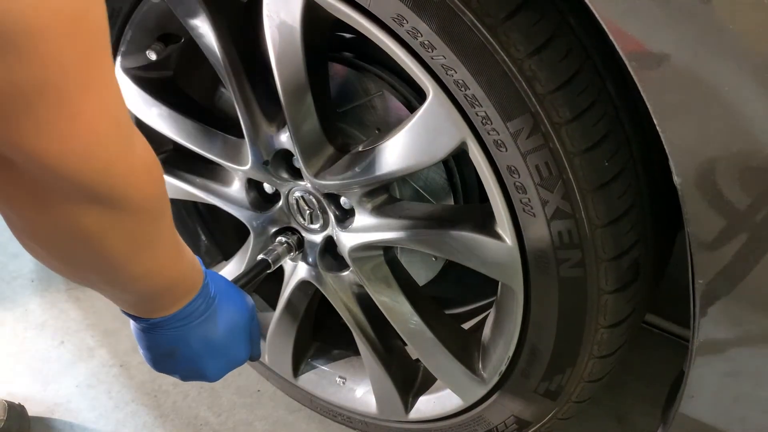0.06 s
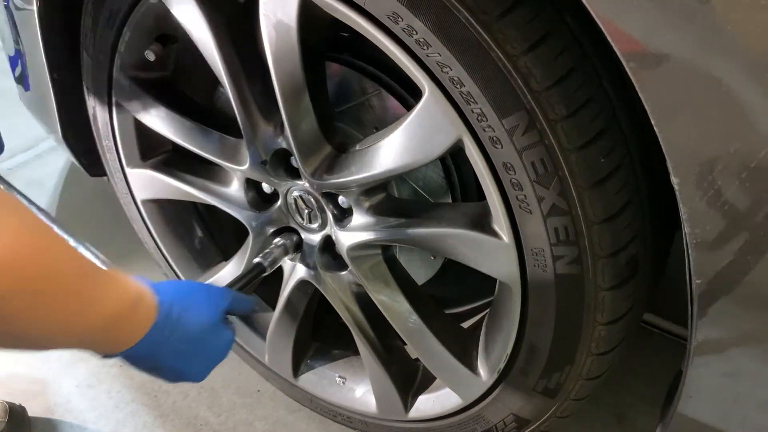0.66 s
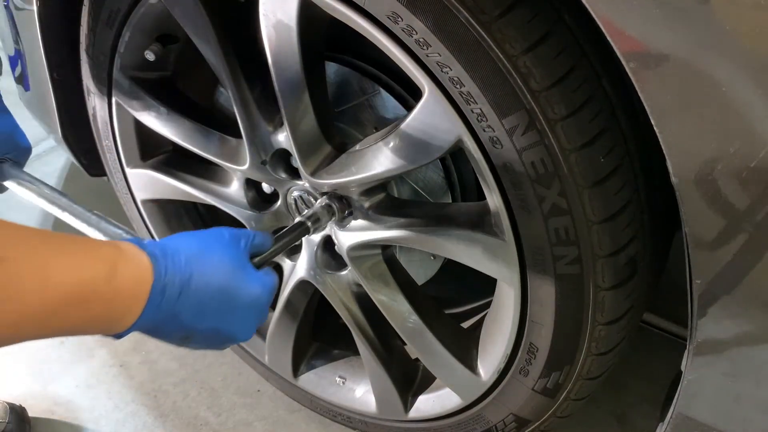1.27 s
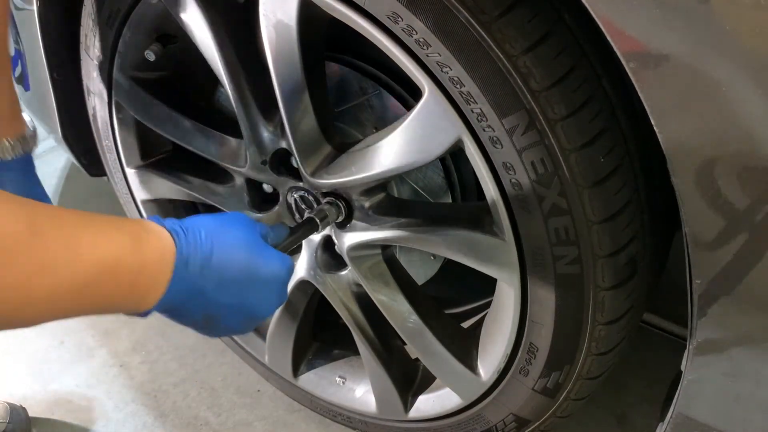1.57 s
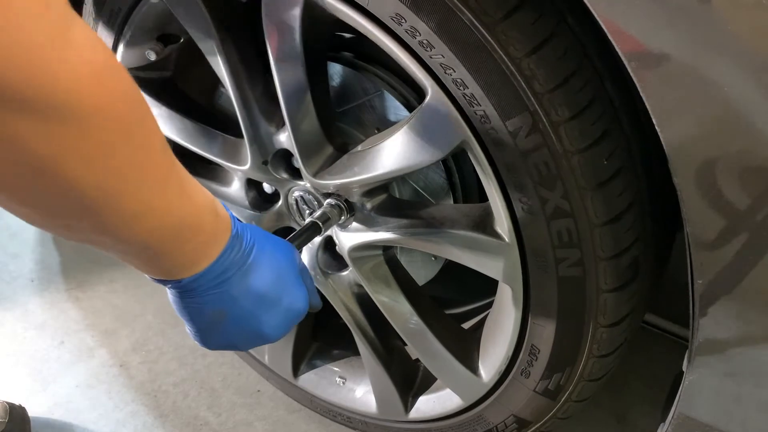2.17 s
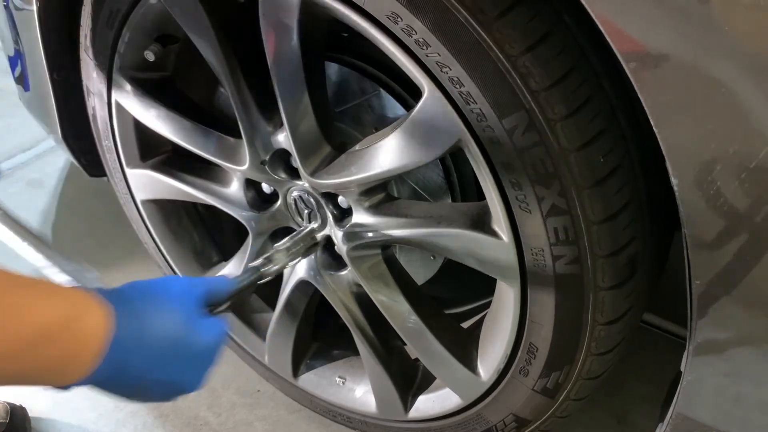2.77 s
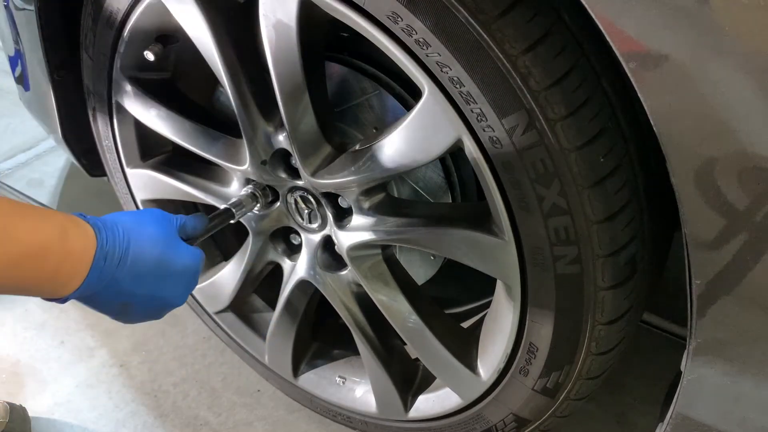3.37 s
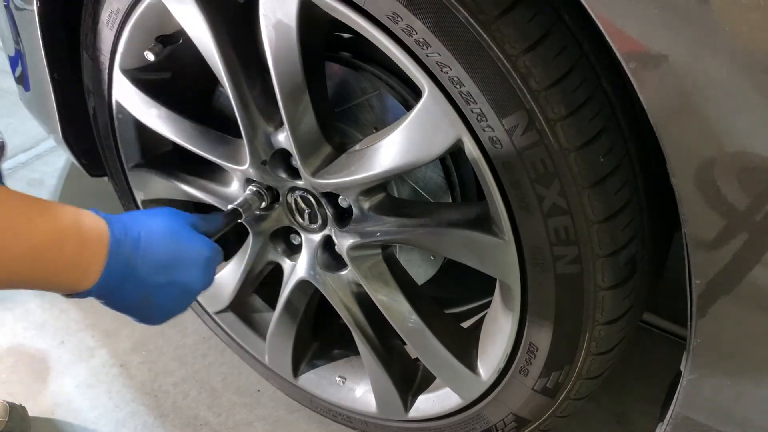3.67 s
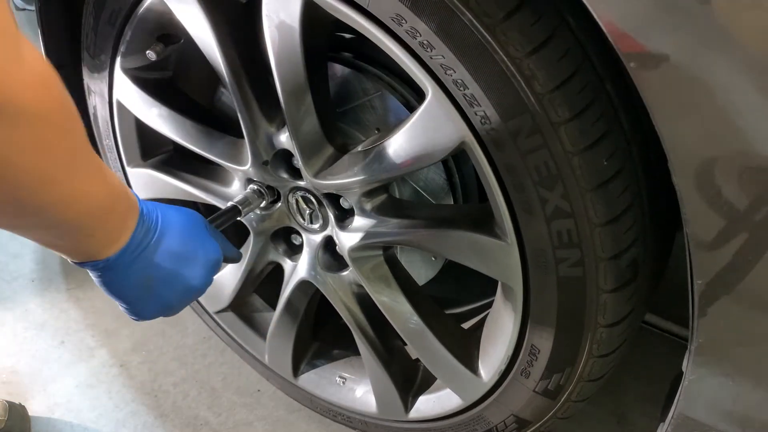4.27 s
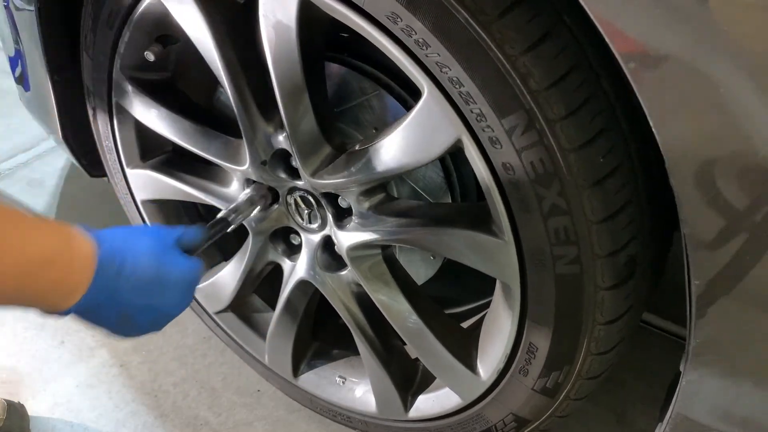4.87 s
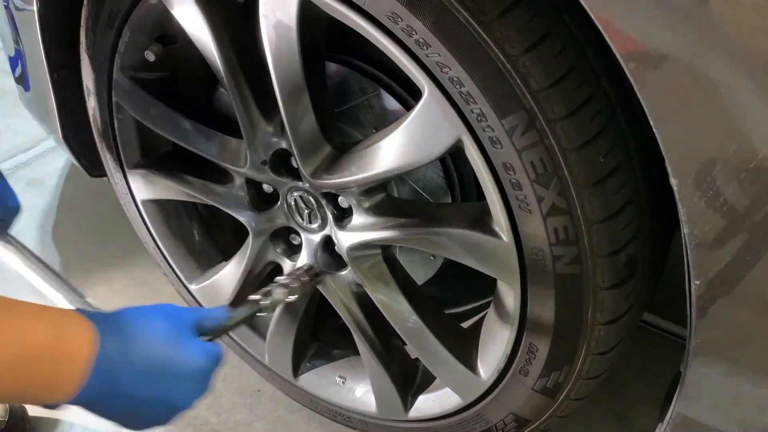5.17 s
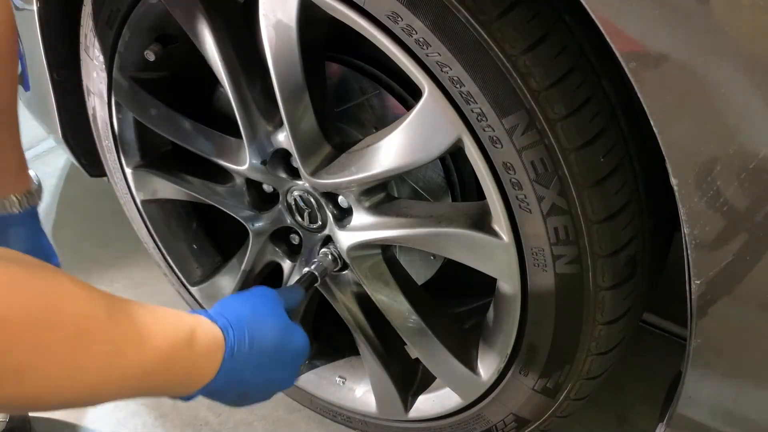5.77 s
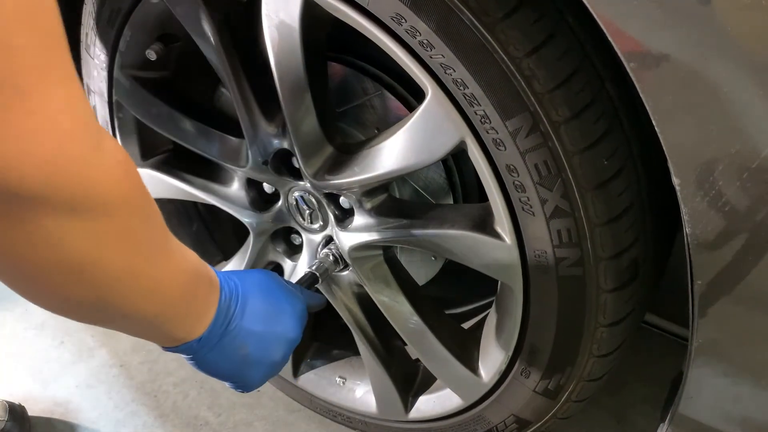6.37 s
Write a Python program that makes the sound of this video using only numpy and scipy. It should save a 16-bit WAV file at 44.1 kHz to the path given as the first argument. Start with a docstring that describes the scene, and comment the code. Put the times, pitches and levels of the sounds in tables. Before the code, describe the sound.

Close by in a small garage, a torque wrench gives a loud, sharp snap on a lug nut, then a softer clack as it resets, leaving the alloy wheel ringing faintly. The socket pings off, knocks against the wheel and slides onto the next nut with faint ratchet ticking. The double click comes three times, and the socket finally clatters onto another nut. A low motor hum and soft rushing air continue underneath.

```python
"""Torque wrench on three lug nuts

A click-type wrench checks an alloy wheel in a home garage. On each nut the pawl trips under load,
then snaps back; the wheel rings on and the tyre rocks. The socket pings as it is pulled off and is
knocked onto the next nut; once it is seated, the ratchet ticks faintly.
A motor hums behind soft rushing air; a limiter ducks after loud snaps."""
import sys
import numpy as np
from scipy import signal
from scipy.fft import rfft, irfft, next_fast_len
from scipy.io import wavfile
from scipy.ndimage import uniform_filter1d

SR = 44100
rng = np.random.default_rng(int(sys.argv[2]) if len(sys.argv) > 2 else 0)


def to_wav(s):
    """Save 16-bit WAV."""
    ch = np.atleast_2d(s).T  # columns
    pcm = np.round(np.clip(ch, -1, 1) * 32767)  # PCM
    wavfile.write(sys.argv[1], SR, pcm.astype(np.int16))


N = 282681
TIME = np.arange(N) / SR

# air spectrum: f/Hz, relative level/dB
AIR_COLOUR = [(20, -39.5), (38, -17.5), (54, -3.5), (85, -6), (120, 1.5), (170, -8.5), (400, -11),
              (850, -21.5), (1600, -22.5), (3200, -32), (7000, -52), (11000, -61.5), (16000, -75.5)]
# air loudness: t/s, level/dB
AIR_LEVEL = [(0, -41.5), (1.2, -42.5), (2.1, -43), (3.2, -43), (4.2, -43.5), (5.2, -45.5), (5.9, -45),
             (6.4, -45.5)]
# motor tones: f/Hz, early level/dB, late level/dB
HUM = [(60.4, -48.5, -55), (109.38, -55.5, -48.5), (237.95, -58.5, -58.5)]
# reverberation time: f/Hz, t60/s
GARAGE_T60 = [(150, 0.17), (1000, 0.74), (3000, 0.64), (7000, 0.5865), (11000, 0.3972), (16000, 0.1522)]
# reverberation strength: f/Hz, level/dB
GARAGE_LEVEL = [(150, -8.5), (500, -9.5), (1500, -5.5), (4000, -5.5), (7000, -12.5), (11000, -12),
                (16000, -11)]
# left-right likeness of noise: f/Hz, coherence/0-1
COHERENCE = [(60, 1), (300, 0.9), (700, 0.2), (1500, 0.01), (4000, 0.3), (6000, 0), (7500, 0.35),
             (9500, .95)]
# left over right: f/Hz, level/dB
BALANCE = [(120, -0.4), (350, 2.5), (1200, 2.5), (2500, 0.5), (5500, -2.5), (8000, 0)]

# modes of hub, wheel, seated socket and free socket: f/Hz, level/dB, t60/s
HUB_MODES = [(1530, -14.5, 0.13), (1607, 9.5, 0.037), (3020, 5, .04)]
WHEEL_OVERTONES = [(1987, -7, 1.34), (1810, -8.5, .5), (6600, -20, .38)]
SOCKET_HELD = [(11850, 2, 0.17), (12130, -5, .05), (12480, -5, .02)]
SOCKET_FREE = [(12110, 6, .13), (12110, -10, 0.2), (12435, -11.5, 0.61)]
WHEEL_HZ, WHEEL_T60_S = 1067.4, 2.2

# socket contact spectrum: f/Hz, relative level/dB
KNOCK_COLOUR = [(80, -21.5), (250, -13.5), (620, 3), (1100, -3.5), (1550, -2), (2100, 2), (2800, 4),
                (4200, -0.5), (7100, -4), (8600, -10.5), (10500, -3), (13000, 0), (16000, -4)]
# socket and extension resonances: f/Hz, width/Hz, level/dB
EXTENSION_PEAKS = [(1552.6, 140, 8.5), (2813.4, 180, -14), (4470, 840, 2.5), (7170, 650, 13)]
# socket slips off or grazes the wheel: t/s, contact/dB, ping/dB
PINGS = [(0.7024, -30, -21), (2.6633, -23.5, -18), (3.163, -61, -44), (3.229, -33, -26.5),
         (4.869, -32.5, -19), (5.44, -44, -41)]
# socket knocks on its way to the next nut; faint ratchet ticks once seated: t/s, level/dB, timbre
# the rows at 1.85, 3.61, 3.77 and 3.91 s are the ticks; they only share the "nut" timbre
KNOCKS_AND_TICKS = [(1.105, -43.5, "nut"), (1.25, -17.5, "spoke"), (1.2592, -26.5, "spoke"),
                    (1.4053, -45, "nut"), (1.4712, -34.5, "nut"), (1.8467, -41, "nut"),
                    (3.2688, -17.5, "nut"), (3.6078, -40, "nut"), (3.77, -42.5, "nut"),
                    (3.9063, -39.5, "nut"), (4.8225, -27.5, "nut"), (5.4590, -20, "hub"),
                    (5.479, -34, "hub"), (5.6401, -31.5, "hub"), (5.6589, -33, "nut"),
                    (5.6929, -23.5, "nut"), (5.711, -43, "nut"), (5.753, -29.5, "nut")]
KNOCK_REF_DB = -29.5  # firm above, light below
# socket slides home: t/s, contact/dB, ring/dB, bottoming t/s, clunk/dB
SEATINGS = [(1.4995, -27, -33, 1.485, -37), (3.427, -20, -57, 3.450, -33.5),
            (5.746, -24.5, -33, 5.752, -37.5)]
# contact timbres: treble/dB, clunk/dB, t60/s, top edge/Hz
PING_TIMBRE = dict(treble_db=7, clunk_db=-6, t60=0.016, top_hz=14500)
KNOCK_TIMBRES = {"spoke": dict(treble_db=6, clunk_db=-2, t60=0.025, top_hz=13400),
                 "hub": dict(treble_db=8, clunk_db=-2, t60=0.038, top_hz=12800),
                 "nut": dict(treble_db=0, clunk_db=2.5, t60=.044, top_hz=15400)}
SEATING_TIMBRE = dict(treble_db=8, clunk_db=8.5, t60=0.059, top_hz=15900)

# snap spectrum: f/Hz, relative level/dB
SNAP_COLOUR = [(60, -24), (170, -12), (280, 1), (480, -1), (750, -5.5), (1100, -8.5), (1600, -2),
               (2500, -3.5), (3600, 1.5), (5000, -3), (7000, 2.5), (8600, -6), (10500, -0.5), (13000, 5.5),
               (16000, -6.5)]
# damped wrench resonances: f/Hz, width/Hz, level/dB
WRENCH_PEAKS = [(1553, 23, 4.5), (1651.8, 50, -0.5), (1900, 250, 4), (2330, 120, 0), (2810, 100, -7.5),
                (3360, 130, 0.5), (3690, 180, 2.5), (5370, 48, -4.5), (5696, 90, -3), (6310, 77, -1),
                (6410, 81, 4), (6958, 100, 4), (9920, 110, 7.5), (11740, 21, -2)]
# pawl trips and resets: t/s, level/dB, treble/dB, rattle t60/s, wheel ring/dB
TRIPS = [(0.1323, 7.5, 0, 0.026, -29.5), (2.3244, 7.5, 5.5, 0.0077, -35.5), (4.5026, 7, 3.5, 0.02, -27.5)]
RESETS = [(0.512, -3, -5.5, 0.056, -30.5), (2.5265, -2, 0, 0.03, -28.5), (4.7093, -3, 2, 0.05, -32)]
# snap timbres: body/dB, bass edge/Hz, scrape/dB, socket/dB, heard build-up/s, wheel overtones/dB
TRIP_TIMBRE = dict(body_db=-6.5, bass_hz=50, scrape_db=-10, socket_db=-15, swell_s=.5, overtones_db=-6.5)
RESET_TIMBRE = dict(body_db=5.5, bass_hz=303, scrape_db=-22, socket_db=-19, swell_s=0.092, overtones_db=0.5)


def from_db(db):
    return 10 ** (np.asarray(db) / 20)


def at_hz(points, hz):
    """Table lookup on a log-frequency axis."""
    known_hz, values = np.transpose(points)
    return np.interp(np.log(hz + 1), np.log(known_hz), values)


def bins_hz(size):
    return np.arange(size // 2 + 1) * SR / size


def lowpass(hz, edge_hz, order):
    return 1 / (1 + (hz / edge_hz) ** order)


def add(out, at_s, sound):
    start = round(at_s * SR)
    out[:, start:start + sound.shape[-1]] += sound[..., :N - start]


def wander(rate_hz, size):
    """Straight lines between random values."""
    return np.interp(TIME[:size] * rate_hz, np.arange(200), rng.standard_normal(200))


def noise(colour, size):
    """Partly coherent stereo noise, rms 1."""
    mid, side = rfft(rng.standard_normal((2, size)))
    coherence = np.clip(at_hz(COHERENCE, bins_hz(size)), 0, 1)
    stereo = np.sqrt(1 + coherence) * mid + np.sqrt(1 - coherence) * side * [[1], [-1]]
    x = irfft(colour * stereo, size)
    return x / np.sqrt(np.mean(x ** 2) + 1e-20)


def ring(modes, size):
    """Decaying sines of a struck object."""
    t = TIME[:size]
    return sum(from_db(db - 60 * t / t60_s) * np.sin(2 * np.pi * hz * t) for hz, db, t60_s in modes)


def resonant(colour, peaks, hz):
    """Broad spectrum with resonances on top."""
    power = sum(from_db(db) ** 2 / (1 + (2 * (hz - peak_hz) / width_hz) ** 2)
                for peak_hz, width_hz, db in peaks)
    return from_db(at_hz(colour, hz)) * np.sqrt(1 + power)


def bump(pitch_hz, swell_s, relative_width, size=32768):
    """Soft low resonance that swells and fades."""
    age = TIME[:size] / swell_s
    band = 1 / (1 + ((bins_hz(size) / pitch_hz - 1) / relative_width) ** 4)
    return age * np.exp(1 - age) * noise(band, size)


def rattle(colour, treble_db, t60_s, hold_s):
    """One blow: parts chatter for hold_s, then die away."""
    size = 2 * (len(colour) - 1)
    hardness = from_db(treble_db * (1 - lowpass(bins_hz(size), 8500, order=6)))
    decay = from_db(-60 * np.maximum(TIME[:size] - hold_s, 0) / t60_s)
    return noise(colour * hardness, size) * decay


def add_scrape(out, blow_s, colour, swell_s, db):
    """Steel slides on steel, swelling up to the blow."""
    size = 2 * (len(colour) - 1)
    rasp = noise(colour, size) * np.exp(-TIME[:size][::-1] / swell_s)
    add(out, blow_s - size / SR, from_db(db) * rasp)


def air():
    """Soft rush, easing slightly."""
    size = next_fast_len(N)
    rush = noise(from_db(at_hz(AIR_COLOUR, bins_hz(size))), size)[:, :N]
    return rush * from_db(np.interp(TIME, *np.transpose(AIR_LEVEL)))


def motor(waver_db=1.0, shift_s=5.23, fade_s=0.5):
    """Wavering hum; its tones shift in balance around shift_s."""
    out = np.zeros(N)
    late = np.clip((TIME - shift_s) / fade_s + .5, 0, 1)
    for hz, early_db, late_db in HUM:
        waver = wander(rate_hz=10, size=N)
        level_db = early_db + (late_db - early_db) * late + waver_db * waver
        out += np.sqrt(2) * from_db(level_db) * np.sin(2 * np.pi * hz * TIME + waver / 2)
    return out


def garage(x, build_s=0.002, near_s=0.09, size=32768):
    """Dense reflections, strongest off the nearby floor and car; each band has its own decay."""
    t, hz, response = TIME[:size], bins_hz(size), 0
    white = rfft(noise(np.ones(len(hz)), size))
    onset = (1 - np.exp(-t / build_s)) * (1 + np.exp(-t / near_s))
    edges_hz = np.geomspace(60, 18000, 18)
    for low_hz, high_hz in zip(edges_hz, edges_hz[1:]):
        centre_hz = np.sqrt(low_hz * high_hz)
        decay = onset * from_db(-60 * t / at_hz(GARAGE_T60, centre_hz))
        band = irfft(white * (hz >= low_hz) * (hz < high_hz), size)
        response += from_db(at_hz(GARAGE_LEVEL, centre_hz)) * band * decay / np.linalg.norm(decay)
    return signal.fftconvolve(x[None], response, axes=-1)[:, :N]


def bumps(tyre_delay_s=.025, tyre_db=-39):
    """The tyre rocks back after each reset; the socket bottoms out on each nut."""
    out = np.zeros((2, N))
    for at_s, *_ in RESETS:
        tyre = bump(pitch_hz=108, swell_s=.045, relative_width=0.13)
        add(out, at_s + tyre_delay_s, from_db(tyre_db) * tyre)
    for *_, bottom_s, db in SEATINGS:
        add(out, bottom_s, from_db(db) * bump(pitch_hz=338, swell_s=.011, relative_width=0.96))
    return out


def hub_and_spoke(clank_db=-15, spoke_db=-34.5):
    """The socket misses the nut: the cast hub clanks, a spoke wakes the wheel's tone."""
    out = np.zeros((2, N))
    responses = {"hub": from_db(clank_db) * ring(HUB_MODES, size=SR // 4),
                 "spoke": from_db(spoke_db) * ring([(WHEEL_HZ, 0, WHEEL_T60_S)], size=2 * SR)}
    for at_s, db, kind in KNOCKS_AND_TICKS:
        if kind in responses:
            add(out, at_s, from_db(db) * responses[kind])
    return out


def wheel(beat_hz=0.91, beat_depth=0.43, build_share=0.17, waver_db=2):
    """The wheel's tone as heard in the room, building up and wavering; each snap restarts it."""
    out = np.zeros((2, N))
    snaps = sorted([(at_s, db, TRIP_TIMBRE) for at_s, *_, db in TRIPS]
                   + [(at_s, db, RESET_TIMBRE) for at_s, *_, db in RESETS])
    ends_s = [at_s for at_s, *_ in snaps[1:]] + [N / SR]
    for (at_s, db, timbre), end_s in zip(snaps, ends_s):
        t = TIME[:round((end_s - at_s) * SR)]
        beating = np.abs(1 + beat_depth * np.exp(2j * np.pi * beat_hz * t)) / 2
        tone = beating * ring([(WHEEL_HZ, 0, WHEEL_T60_S)], len(t))
        overtones = from_db(timbre["overtones_db"]) * ring(WHEEL_OVERTONES, len(t))
        build_up = 1 - build_share * np.exp(-t / timbre["swell_s"])
        add(out, at_s, from_db(db) * build_up * (tone + overtones))
    return out * from_db(waver_db * wander(rate_hz=7, size=N))


def add_contact(out, at_s, db, timbre, force_db=0):
    """Metal slides, then strikes: bright when hard, mostly clunk when light."""
    hz = bins_hz(4096)
    treble_db = timbre["treble_db"] + 1.44 * force_db
    clunk_db = (timbre["clunk_db"] - 3.06 * force_db) * lowpass(hz, 479, order=4)
    colour = resonant(KNOCK_COLOUR, EXTENSION_PEAKS, hz) * from_db(clunk_db)
    colour *= lowpass(hz, timbre["top_hz"], order=24)
    add_scrape(out, at_s, colour, swell_s=0.00365, db=db - 11)
    add(out, at_s, from_db(db) * rattle(colour, treble_db, timbre["t60"], hold_s=.0015))


def socket_pings(shimmer_db=7.0, rise_s=0.0017, damp_s=0.011):
    """The free socket rings, shimmering as it swings, until a firm knock damps it."""
    out, t = np.zeros((2, N)), TIME[:SR]
    firm_knocks_s = [at_s for at_s, db, _ in KNOCKS_AND_TICKS if db > KNOCK_REF_DB]
    for at_s, contact_db, ping_db in PINGS:
        add_contact(out, at_s, contact_db, PING_TIMBRE)
        free_s = min(knock_s for knock_s in firm_knocks_s if knock_s > at_s) - at_s
        envelope = (1 - np.exp(-t / rise_s)) * np.exp(-np.maximum(t - free_s, 0) / damp_s)
        for mode in SOCKET_FREE:
            dip_db = shimmer_db * np.abs(wander(rate_hz=25, size=SR))
            add(out, at_s, from_db(ping_db - dip_db) * envelope * ring([mode], size=SR))
    return out


def knocks_and_ticks(skid_count=3, skid_s=.03, skid_db=-13):
    """The socket knocks, skids and seats with a short ring; once seated, the ratchet ticks."""
    out = np.zeros((2, N))
    for at_s, db, kind in KNOCKS_AND_TICKS:
        timbre, force_db = KNOCK_TIMBRES[kind], db - KNOCK_REF_DB
        add_contact(out, at_s, db, timbre, force_db)
        for delay_s in skid_s * rng.random(skid_count):
            add_contact(out, at_s + delay_s, db + skid_db, timbre, force_db + skid_db)
    for at_s, db, ring_db, *_ in SEATINGS:
        add_contact(out, at_s, db, SEATING_TIMBRE)
        add(out, at_s, from_db(ring_db) * ring(SOCKET_HELD, size=SR // 2))
    return out


def pawl():
    """Trips at the set torque, resets as the hand lets go; both snaps ring the seated socket."""
    out, hz = np.zeros((2, N)), bins_hz(4096)
    socket = ring(SOCKET_HELD, size=SR // 2)
    steel = resonant(SNAP_COLOUR, WRENCH_PEAKS, hz)
    scrape_colour = steel * (1 - lowpass(hz, 470, order=3)) * lowpass(hz, 7520, order=16)
    # the wrench body is tight under load and knocks more once let go
    body_band = lowpass(hz, 1400, order=6) * (1 - lowpass(hz, 520, order=6))
    for snaps, timbre in (TRIPS, TRIP_TIMBRE), (RESETS, RESET_TIMBRE):
        bass_cut = 1 - lowpass(hz, timbre["bass_hz"], order=3)
        colour = steel * from_db(timbre["body_db"] * body_band) * bass_cut
        for at_s, db, treble_db, t60_s, _ in snaps:
            add_scrape(out, at_s, scrape_colour, swell_s=0.0045, db=timbre["scrape_db"])
            add(out, at_s, from_db(db) * rattle(colour, treble_db, t60_s, hold_s=0.0042))
            add(out, at_s, from_db(timbre["socket_db"]) * socket)
    return out


def scene(snap_send_db=-3.5, contact_send_db=-2.0):
    """Wrench and socket close by; each side reverberates by its own paths."""
    snaps = pawl()
    contacts = socket_pings() + knocks_and_ticks()
    send = from_db(snap_send_db) * snaps + from_db(contact_send_db) * contacts
    room = sum(garage(side) for side in send)
    return snaps + contacts + hub_and_spoke() + wheel() + bumps() + room + air() + motor()


def microphones(x, left_lag_s=.000183, split_hz=1900):
    """The sides differ in colour; treble reaches the left one later."""
    size = next_fast_len(N + SR // 10)
    hz = bins_hz(size)
    left, right = rfft(x, size) * from_db(at_hz(BALANCE, hz) * np.array([[.5], [-.5]]))
    lag_s = left_lag_s * (1 - lowpass(hz, split_hz, order=4))
    left *= np.exp(-2j * np.pi * hz * lag_s)
    return irfft(np.array([left, right]), size)[:, :N]


def limiter(x, threshold_db=-5.5, release_db_per_s=55):
    """Gain drops at once on a loud snap and creeps back."""
    power = uniform_filter1d(np.mean(x ** 2, axis=0), size=100)
    over_db = np.maximum(10 * np.log10(np.maximum(power, 1e-12)) - threshold_db, 0)
    release_db = release_db_per_s * TIME
    cut_db = np.maximum.accumulate(over_db + release_db) - release_db
    return x * from_db(-uniform_filter1d(cut_db, size=40))


def record(dry):
    """Microphones, limiter, peak clipping, steep top cut."""
    clipped = np.clip(limiter(microphones(dry)), -.88, .88)
    top_cut = signal.ellip(8, .05, 50, 16100, fs=SR, output="sos")
    return signal.sosfiltfilt(top_cut, clipped)


dry = scene()
out = record(dry)
to_wav(out)
```